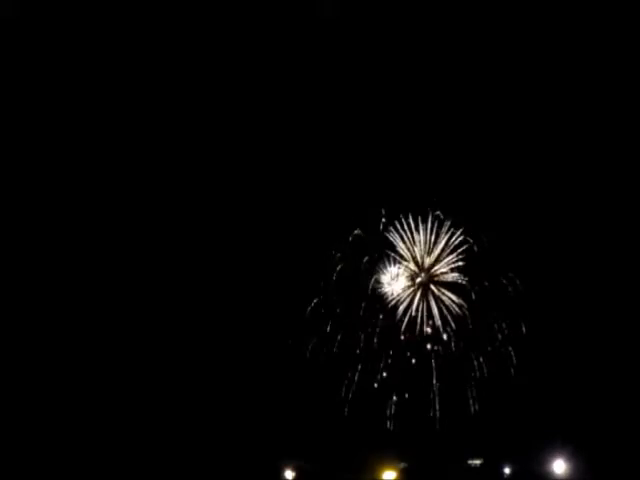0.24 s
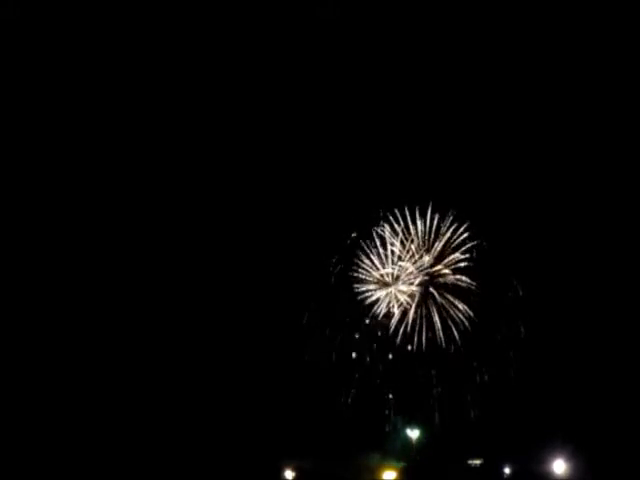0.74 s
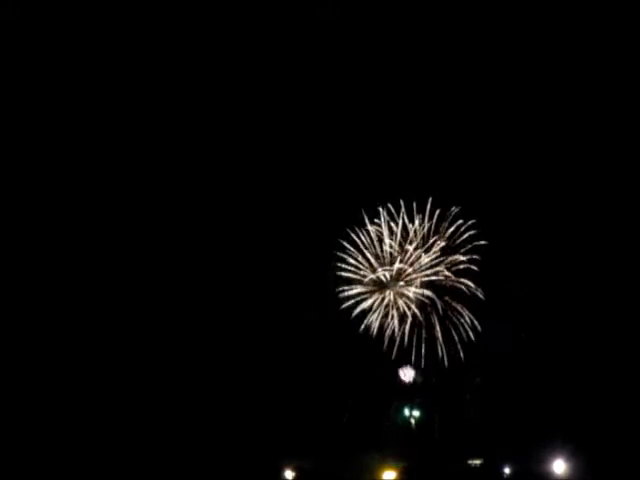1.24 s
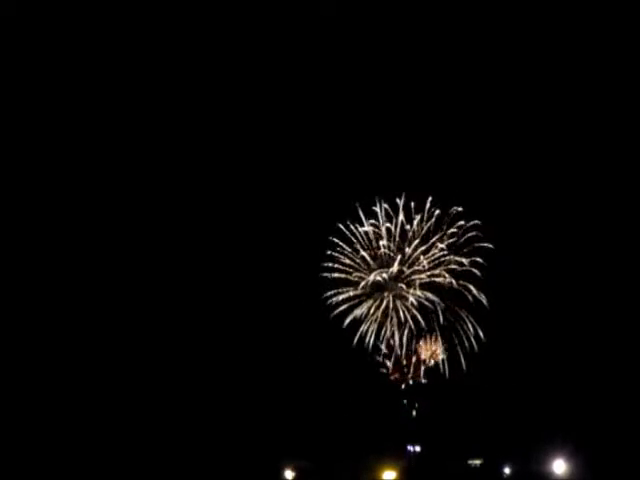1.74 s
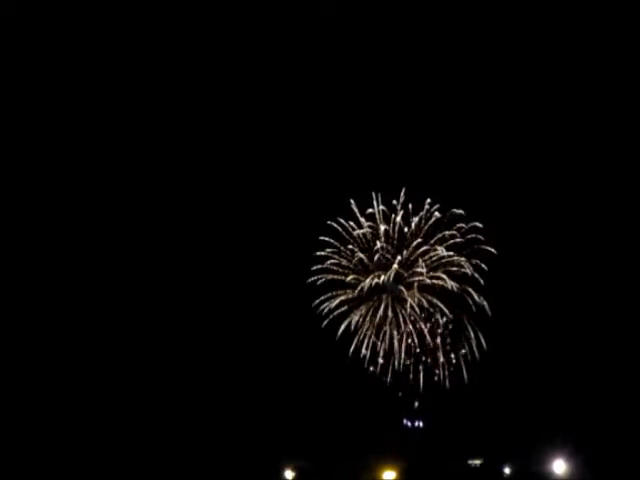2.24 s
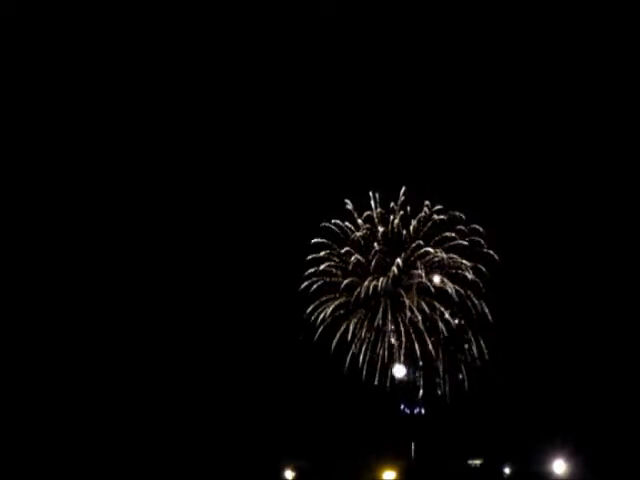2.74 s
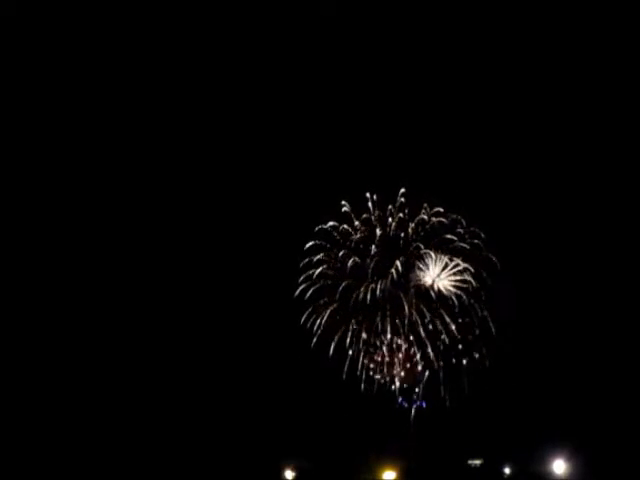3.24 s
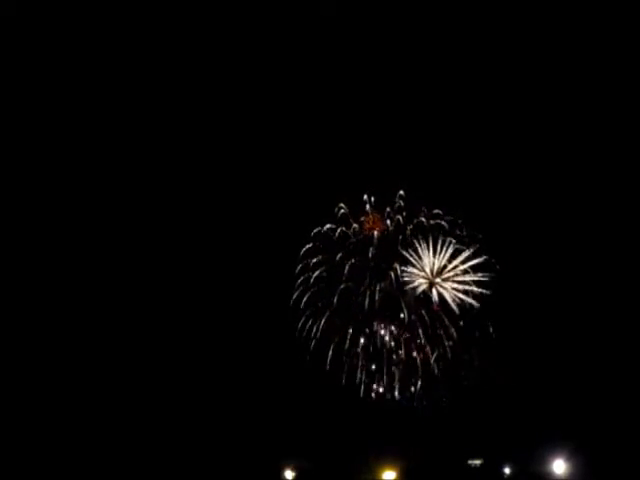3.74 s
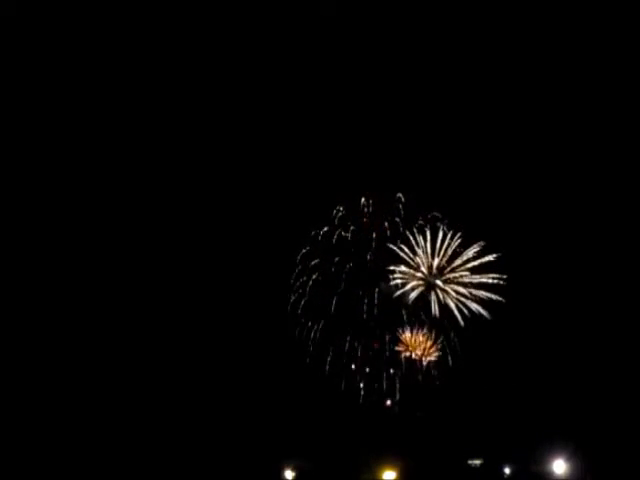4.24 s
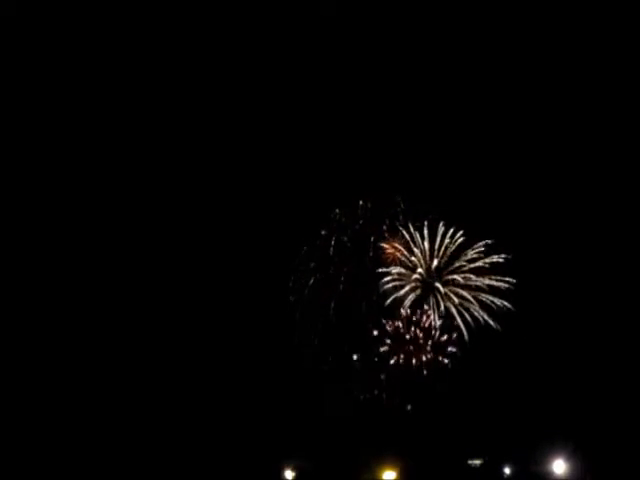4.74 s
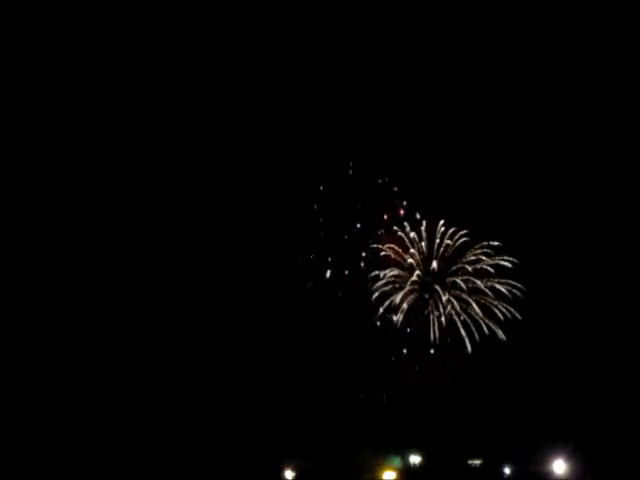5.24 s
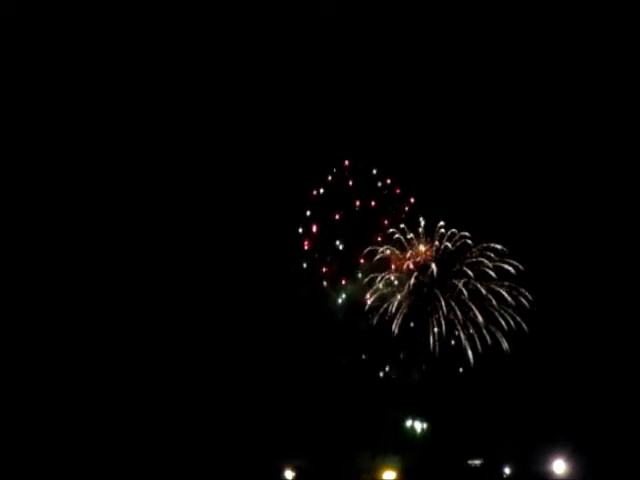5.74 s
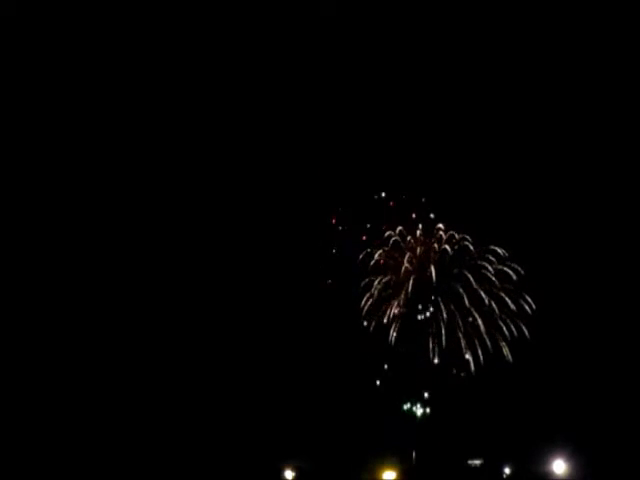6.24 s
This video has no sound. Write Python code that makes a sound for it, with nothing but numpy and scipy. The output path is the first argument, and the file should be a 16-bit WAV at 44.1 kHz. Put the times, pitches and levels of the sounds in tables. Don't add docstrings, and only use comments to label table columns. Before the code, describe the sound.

Open fields at night, heard through a small recorder. Katydids make a dense, scratchy high shimmer, crickets trill in short pure-toned groups, and lower falling chirps run in trains, over faint low hum, rumble and distant crackling. Frogs give short pulsed croaks from the start to about 1.2 s. At 0.45 s a hard, overloaded firework bang cracks, echoes briefly and rolls away, and the insects dip. A weak thump comes at 1.85 s, with small snaps at 1.1 and 2.5 s. An insect buzz rises near 2.9 s, then sharp bangs strike at 3.1 and 3.36 s. A faint whistle wavers around 3.9-4.2 s among little pops, before another strong bang at 4.3 s. The chorus recovers; a duller thump lands at 5.47 s and a far boom at 5.86 s, while frogs croak again from 5.65 to 6.25 s. One last pop sounds at 6.15 s and insects continue to the end, about 6.5 s.

```python
import sys
import numpy as np
from scipy import signal
from scipy.fft import rfft, irfft
from scipy.io import wavfile
from scipy.ndimage import uniform_filter1d, map_coordinates

SR = 44100
rng = np.random.default_rng(int(sys.argv[2]) if len(sys.argv) > 2 else 0)


def inscribe(sig):
    pcm = np.round(np.clip(np.atleast_2d(sig).T, -1, 1) * 32767)
    wavfile.write(sys.argv[1], SR, pcm.astype(np.int16))


def linear_from_db(decibels):
    return 10 ** (np.asarray(decibels, float) / 20)


N = 286650
TIME = np.arange(N) / SR

# start in seconds, strength in dB, blast length, rise time and
# ground bounce delay in milliseconds.
BURSTS = [
    (0.4538, 10.5, 4.7, 0.98, 1.36),
    (3.1022, 9, 4.9, 0.72, 1.72),
    (3.3574, 10, 6, 0.95, 0.96),
    (4.2944, 9, 21, 0.47, 0.76),
]
# start in seconds, strength in dB, length, rise and bounce in milliseconds.
THUMPS = [
    (1.8516, -1, 11, 0.67, 2.25),
    (5.465, 6, 21, 1.33, 2.87),
]
# start in seconds, strength in dB, length, rise and
# bounce in milliseconds.
BOOM = [
    (5.8585, 8, 7.2, 1.19, 2.77),
]


def rms_one(x):
    return x / np.sqrt(np.mean(x ** 2) + 1e-20)


def in_time(rows):
    s, *columns = np.transpose(rows)
    return [np.interp(TIME, s, c) for c in columns]


def drift(rate):
    steps = rng.standard_normal(int(N / SR * rate * 2) + 3)
    return rms_one(map_coordinates(steps, [np.linspace(0, len(steps) - 1, N)], order=3))


def resonate(x, hz, width_hz):
    r = np.exp(-np.pi * width_hz / SR)
    poles = [1, -2 * r * np.cos(2 * np.pi * hz / SR), r * r]
    return signal.lfilter([(1 - r * r) / 2, 0, (r * r - 1) / 2], poles, x + 1e-18)


def resonate_twice(x, hz, width_hz):
    return resonate(resonate(x, hz, width_hz), hz, width_hz)


def filtered(x, order, hz, kind="low"):
    return signal.sosfilt(signal.butter(order, hz, kind, fs=SR, output="sos"), x)


def coloured(x, spectrum):
    hz, db = np.transpose(spectrum)
    bins = np.maximum(np.arange(N // 2 + 1) * SR / N, 1)
    return rms_one(irfft(rfft(x) * linear_from_db(np.interp(np.log(bins), np.log(hz), db, -90, -90)), N))


def add(out, s, piece):
    i = max(round(s * SR), 0)
    out[i:i + len(piece)] += piece[:N - i]


def gain_control():
    # time in seconds, gain in dB as the level of the katydid chorus.
    gain = [(0.0, -45.5), (0.02, -45), (0.42, -43), (0.5, -48.5), (2.97, -38.5), (3.33, -43.5), (3.4, -48),
            (3.71, -43.5), (4.29, -40), (4.31, -49), (4.63, -44), (6.45, -39), (6.5, -38)]
    return in_time(gain)[0]


def drone(gain_db):
    # frequency in Hz, level in dB per Hz.
    spectrum = [(18, -36), (25, -1), (45, -6), (70, 0.5), (92, -1), (125, -6), (170, -40)]
    level_db = -45.5 + 0.58 * (gain_db - gain_db.mean())
    return linear_from_db(level_db) * coloured(rng.standard_normal(N), spectrum)


def afterroll():
    rise_s, fade_s = 0.046, 0.29
    power = np.zeros(N)
    for s, db, *_ in BURSTS + THUMPS + BOOM:
        u = np.maximum(TIME - s, 0)
        power += linear_from_db(db) * (1 - np.exp(-u / rise_s)) * np.exp(-u / fade_s)
    return power


def rumble(roll):
    # frequency in Hz, level in dB per Hz.
    spectrum = [(95, -43), (135, 0.5), (250, -0.5), (320, -3), (400, -8), (560, -13), (760, -24),
                (1000, -97)]
    lumps_db = 1.3 * drift(14)
    level = np.sqrt(linear_from_db(-5.5) ** 2 + linear_from_db(-3.5) ** 2 * roll)
    return level * linear_from_db(lumps_db) * coloured(rng.standard_normal(N), spectrum)


def crackle(roll):
    # frequency in Hz, level in dB per Hz.
    night = [(700, -10), (950, 2.5), (1300, 2.5), (2000, -1), (2900, -11), (4000, -10.5), (4400, -18),
             (4600, -23), (4800, -25.5), (5050, -12.5), (6300, -14.5), (7200, -4)]
    level = np.sqrt(linear_from_db(-13) ** 2 + linear_from_db(-19) ** 2 * roll)
    return level * linear_from_db(0.24 * drift(40)) * coloured(rng.standard_normal(N), night)


def machines(gain_db):
    generator = rms_one(resonate_twice(rng.standard_normal(N), 932, 47))
    motor = rms_one(resonate_twice(rng.standard_normal(N), 95.4, 12))
    fading = 1 / (1 + (TIME / 1.3) ** 6)
    return linear_from_db(gain_db - 23.5) * generator + linear_from_db(-50) * fading * motor


def far_crickets():
    out = np.zeros(N)
    for hz, db in [(5320, -2), (5550, 0), (5750, -8), (5970, -11)]:
        throb = np.clip(.5 + np.sin(2 * np.pi * (14.5 * TIME + 0.5 * drift(1.5))), .3, 1)
        band = rms_one(resonate_twice(rng.standard_normal(N), hz, 150))
        out += linear_from_db(db + 1.0 * drift(1.2)) * throb * band
    return linear_from_db(-21) * out


def katydids():
    # frequency in Hz, wing radiation in dB.
    wings = [(3710, -77), (6300, -36), (6960, -25.5), (8030, -7), (8940, -4), (9920, -5), (13600, -27),
             (15000, -20.5), (15800, -25)]
    strokes_hz = 138.6
    turn = strokes_hz * TIME + 0.062 * drift(25)
    swing = np.cos(2 * np.pi * turn)
    stroke = np.exp(2.2 * (swing - 1)) + .25 * np.exp(4.0 * (-swing - 1))
    sweep_hz = 9200 - 1500 * np.sin(4 * np.pi * turn) + 800 * np.tanh(drift(90))
    scrape = np.sqrt(2) * np.sin(2 * np.pi * np.cumsum(sweep_hz) / SR) + .55 * rng.standard_normal(N)
    near = rms_one(stroke * linear_from_db(0.23 * drift(63)) * scrape)
    power = uniform_filter1d(np.abs(rfft(near)) ** 2, size=2000)
    near = rms_one(irfft(rfft(near) / np.sqrt(power), N))
    near = filtered(near, 3, 11300)
    return coloured(near + 0.84 * rng.standard_normal(N), wings)


def note(length, hz, glide_hz, edge, arch_hz=0):
    along = np.linspace(-.5, .5, round(length * SR))
    pitch_hz = hz + glide_hz * along + arch_hz * (1 / 3 - 4 * along ** 2)
    phase = 2 * np.pi * np.cumsum(pitch_hz) / SR
    return np.sqrt(2) * signal.windows.tukey(len(along), edge) * np.sin(phase + rng.uniform(0, 7.3))


def phrase_notes(rows, gap, swell_db):
    notes = []
    for first, last, *voice, db in rows:
        count = round((last - first) / gap) + 1
        for k, s in enumerate(np.linspace(first, last, count)):
            level_db = db - swell_db * (count - 1 - k) + 1.2 * rng.standard_normal()
            notes.append((s, *voice, level_db))
    return notes


def crickets(gain_db):
    # first note and last note in seconds, pitch in Hz, level in dB.
    trills = [(.0, .062, 5570, -60), (.183, .324, 5544, -52.5), (.81, .81, 5570, -69),
              (.855, 1.043, 5535, -62), (1.409, 1.559, 5600, -62), (1.641, 1.773, 5550, -64),
              (1.846, 2.175, 5545, -56.5), (2.215, 2.41, 5600, -60), (2.504, 2.504, 5512, -51),
              (2.696, 2.824, 5540, -47), (2.998, 2.998, 5540, -66), (3.225, 3.295, 5540, -57),
              (3.497, 3.639, 5535, -59), (3.737, 3.881, 5565, -59), (4.013, 4.013, 5523, -67),
              (4.193, 4.265, 5582, -50.5), (4.34, 4.34, 5598, -64), (4.52, 4.652, 5558, -55.5),
              (4.812, 4.961, 5545, -54.5), (5.071, 5.071, 5534, -86), (5.303, 5.303, 5598, -76),
              (5.393, 5.677, 5545, -50), (5.822, 5.969, 5540, -69), (6.162, 6.3, 5540, -50),
              (6.407, 6.475, 5525, -95)]
    # first note and last note in seconds, pitch in Hz, level in dB.
    low_trills = [(.032, .122, 5290, -64), (.326, .399, 5340, -57), (.788, .915, 5220, -64),
                  (1.729, 1.836, 5440, -62), (2.018, 2.178, 5320, -55), (2.721, 2.911, 5310, -51.5),
                  (2.993, 2.993, 5361, -56), (3.322, 3.322, 5297, -56), (3.51, 3.804, 5335, -53),
                  (4.156, 4.156, 5275, -68), (4.435, 4.577, 5300, -89), (4.976, 5.101, 5310, -60),
                  (5.171, 5.241, 5318, -57), (5.369, 5.369, 5400, -70), (5.82, 5.956, 5300, -57),
                  (6.371, 6.443, 5345, -48.5)]
    # first and last note in seconds, pitch in Hz, last level in dB.
    chirrups = [(.322, .322, 5673, -50), (.511, .659, 5706, -49), (3.076, 3.14, 5706, -60),
                (5.016, 5.163, 5690, -50.5), (5.722, 5.874, 5690, -48), (6.261, 6.261, 5706, -54),
                (.285, .285, 4960, -64), (.514, .649, 5030, -56), (.812, .812, 5010, -64),
                (1.078, 1.078, 5050, -64), (1.26, 1.412, 5090, -55), (3.2, 3.27, 4970, -61),
                (3.415, 3.617, 5030, -53), (4.121, 4.121, 5006, -59), (4.29, 4.44, 5092, -58),
                (4.592, 4.727, 5036, -51), (.594, .659, 5943, -64), (1.205, 1.344, 5955, -59),
                (3.278, 3.278, 5921, -55), (3.475, 3.547, 5948, -60), (4.083, 4.225, 5953, -54),
                (6.17, 6.313, 5940, -53)]
    # first and last note in seconds, level in dB against the gain.
    slow_trains = [
        (.039, .485, -23),
        (1.791, 2.246, -23.5),
        (4.0, 4.234, -23),
        (4.379, 4.523, -23.5),
        (5.966, 6.346, -22.5),
    ]
    # first and last note in seconds, dB against the gain.
    fast_trains = [(.556, .967, -23), (1.053, 1.293, -25), (1.383, 1.426, -25), (1.526, 1.573, -24),
                   (1.667, 1.711, -25), (2.333, 2.81, -26), (2.898, 3.044, -22.5), (3.142, 3.289, -26),
                   (4.592, 5.108, -25), (5.197, 5.344, -27), (5.434, 5.477, -23), (5.566, 5.608, -27),
                   (5.702, 5.745, -22), (5.838, 5.884, -20.5), (6.439, 6.483, -65)]
    near, falling = np.zeros(N), np.zeros(N)
    steady = phrase_notes(trills + low_trills, .068, 0)
    swelling = phrase_notes(chirrups, .068, 2.2)
    for notes, glide_hz, length in (steady, 40, .052), (swelling, 90, .049):
        for s, hz, db in notes:
            add(near, s - .027, linear_from_db(db - 8.0) * note(length, hz, glide_hz, 0.26, arch_hz=35))
    for s, db in phrase_notes(slow_trains, .076, 0) + phrase_notes(fast_trains, .047, 0):
        add(falling, s - .022, linear_from_db(db - 1.3) * note(0.056, 4050, -700, 0.7))
    near *= linear_from_db(1.2 * drift(50))
    grass_echo = .25 * np.roll(near, round(.013 * SR))
    return near + grass_echo + falling * linear_from_db(gain_db + 1.0 * drift(60))


def frogs():
    # start in seconds, length in seconds, vocal sac level in dB, overtone level in dB.
    croaks = [(0.039, 0.11, -53.5, -59), (0.172, 0.066, -52, -67), (0.254, 0.11, -57, -59),
              (.367, 0.087, -49.5, -57), (0.6, .1, -62, -61), (0.715, 0.11, -54.5, -61),
              (0.887, .1, -57, -60), (1.016, .11, -53.5, -60.5), (1.157, 0.074, -55.5, -67),
              (5.654, 0.082, -47.5, -54.5), (5.746, 0.071, -45.5, -62), (5.784, .075, -47, -53),
              (5.915, 0.087, -46, -54.5), (6.044, 0.14, -50.5, -56), (6.171, .085, -45, -53)]
    pulses_hz, pulse_sag = 100, .02
    out = np.zeros(N)
    for s, length, sac_db, top_db in croaks:
        u = TIME[:round(length * SR)]
        rate = (pulses_hz + 4 * rng.standard_normal()) * (1 - pulse_sag * (u / length - 1))
        turn = np.floor(rate * u + rng.random())
        pulses = np.diff(turn, prepend=turn[0]) * linear_from_db(2 * rng.standard_normal(len(u)))
        pulses += .015 * rng.standard_normal(len(u))
        size = 1 + .01 * rng.standard_normal()
        # Hz, dB, share of the croak
        for hz, db, share in (1347, sac_db, 1), (2957, top_db, .8), (3160, top_db - 6.5, .8):
            part = pulses[:round(len(u) * share)]
            ring = rms_one(resonate_twice(part, hz * size, 230))
            add(out, s, linear_from_db(db) * signal.windows.tukey(len(part), .45) * ring)
    return out + .3 * np.roll(out, round(.031 * SR))


def buzzer():
    # start in seconds, length in seconds, level in dB.
    buzzes = [
        (.03, .22, -60),
        (1.36, 0.43, -58),
        (2.87, 0.29, -49),
        (4.33, .34, -61),
        (5.68, 0.46, -52.5),
    ]
    multiples = [35, 36, 37, 39, 40, 42, 43]
    tones_db = [-3, -2, -6, -7, -10, -15, -17]
    level = np.zeros(N)
    for s, length, db in buzzes:
        add(level, s, linear_from_db(db) * signal.windows.tukey(round(length * SR), .5))
    turn = 2 * np.pi * 307.0 * TIME
    comb = np.zeros(N)
    for k, db in zip(multiples, tones_db):
        comb += linear_from_db(db + 2.2 * drift(6)) * np.sin(k * turn + 1.7 * drift(14))
    return level * comb


def whistle():
    # time in seconds, pitch in Hz, level in dB.
    climb = [(3.84, 3300, -78), (3.9, 3370, -71), (4.18, 3260, -74)]
    hz, db = in_time(climb)
    start, end = climb[0][0], climb[-1][0]
    sounding = np.interp(TIME, [start - .03, start, end, end + .03], [0, 1, 1, 0])
    tone = np.sin(2 * np.pi * np.cumsum(hz) / SR)
    return np.sqrt(2) * sounding * linear_from_db(db + 2.2 * drift(29)) * tone


def pops():
    # start in seconds, peak in dB, centre in Hz, highest frequency left by the air in Hz.
    stars = [
        (1.13, -34.5, 1850, 3220),
        (2.533, -26, 1430, 3020),
        (3.599, -39, 1360, 3280),
        (3.784, -23.5, 1830, 3080),
        (3.851, -36, 713, 3280),
        (4.032, -31, 1620, 3200),
        (4.974, -29, 1120, 3330),
        (5.042, -35.5, 939, 3220),
        (6.148, -25, 1290, 3240),
    ]
    out, u = np.zeros(N), TIME[:SR // 20]
    for s, db, hz, top_hz in stars:
        click = 0.073 * rng.standard_normal(len(u)) * np.exp(-u / 0.0031)
        click[40] -= 1
        snap = filtered(resonate(click, hz, 820) + 1.3 * resonate(click, 650, 1050), 8, top_hz)
        add(out, s, linear_from_db(db) * snap / np.abs(snap).max())
    return out


def blast(u, length, rise, front):
    u = np.maximum(u, 0)
    edge = 1 - front * np.exp(-(u / 0.00014) ** 2) - (1 - front) * np.exp(-(u / rise) ** 2)
    return edge * (1 - u / length) * np.exp(-u / length)


def bangs(rows, front, crack_db, tail_db, top_hz):
    # delay in seconds off a far wall, level in dB.
    echoes = [
        (0.0115, -61),
        (0.022, -10),
    ]
    wave, scatter, roll = np.zeros(N), np.zeros(N), np.zeros(N)
    u = TIME[:2 * SR // 5]
    for s, db, length_ms, rise_ms, bounce_ms, share in rows:
        length = length_ms / 1000
        one = blast(u, length, rise_ms / 1000, front)
        one += share * blast(u - bounce_ms / 1000, length, 0.00082, 0)
        for lag, echo_db in echoes:
            one += linear_from_db(echo_db) * blast(u - lag, length, 0.0026, 0)
        add(wave, s, linear_from_db(db) * one)
        dying = linear_from_db(crack_db) * np.exp(-u / .0017) + linear_from_db(tail_db) * np.exp(-u / .04)
        dying += linear_from_db(crack_db - 20) * np.exp(-((u - .021) / .003) ** 2)
        dying += linear_from_db(crack_db - 30) * np.exp(-((u - .06) / .011) ** 2)
        add(scatter, s, linear_from_db(db - 6.5 * rise_ms) * dying * rng.standard_normal(len(u)))
        add(roll, s + .009, linear_from_db(db - 23) * np.exp(-u / 0.02) * rng.standard_normal(len(u)))
    scatter = filtered(scatter, 4, [500, 2600], "band") + filtered(roll, 2, [110, 380], "band")
    return filtered(wave + scatter, 4, top_hz)


def fireworks():
    sharp = [row + (0.32,) for row in BURSTS]
    dull = [row + (0.46,) for row in THUMPS] + [row + (-0.29,) for row in BOOM]
    return bangs(sharp, 0.35, -17.5, -46.5, 5900) + bangs(dull, 0.05, -15.5, -39, 4500)


def microphone(x):
    w = 2 * np.pi * 190
    cut = signal.lfilter(*signal.bilinear([1, 0, 0], [1, w / 1.4, w * w], SR), x + 1e-18)
    cut = filtered(cut, 2, 45, "high")
    return cut + 1.2 * resonate(cut, 365, 40)


def scene():
    gain_db = gain_control()
    roll = afterroll()
    steady = linear_from_db(gain_db) * (katydids() + far_crickets() + rumble(roll) + crackle(roll))
    night = drone(gain_db) + machines(gain_db) + steady
    animals = crickets(gain_db) + frogs() + buzzer()
    display = whistle() + pops() + microphone(fireworks())
    return (night + animals + display)[None]


def low_pass(x):
    return signal.sosfilt(signal.butter(12, 15750, fs=SR, output="sos"), x)


def record(dry):
    return low_pass(np.clip(dry, -1, 1))


dry = scene()
out = record(dry)
inscribe(out)
```